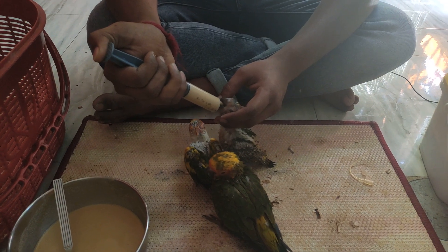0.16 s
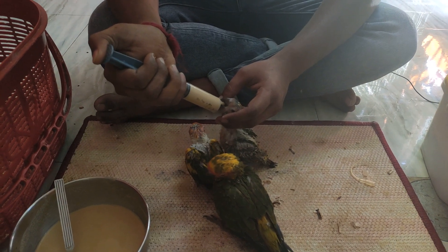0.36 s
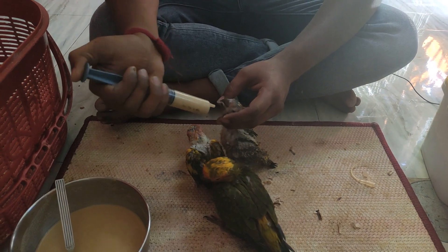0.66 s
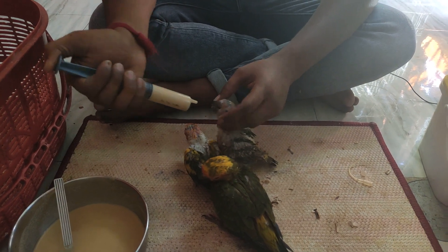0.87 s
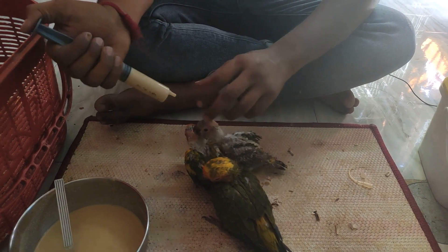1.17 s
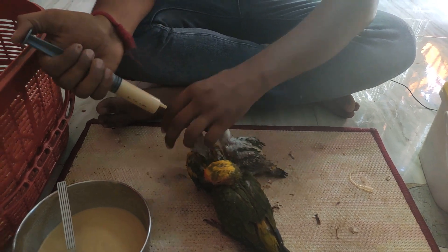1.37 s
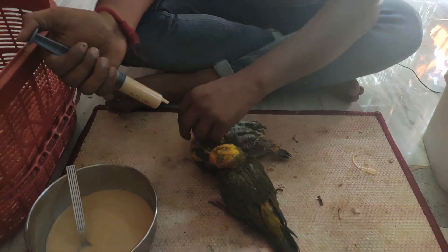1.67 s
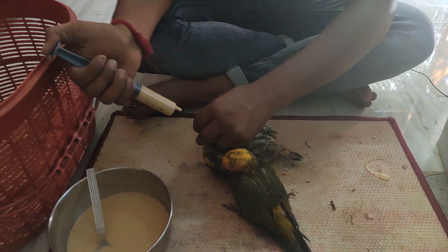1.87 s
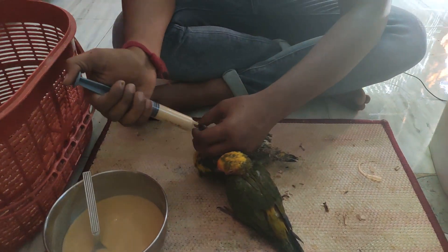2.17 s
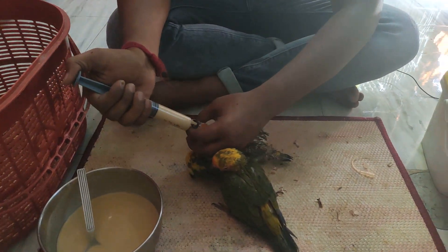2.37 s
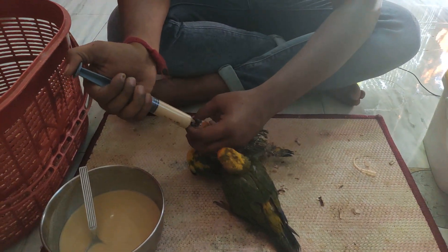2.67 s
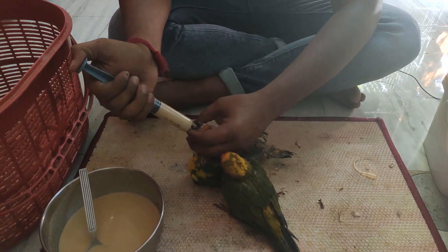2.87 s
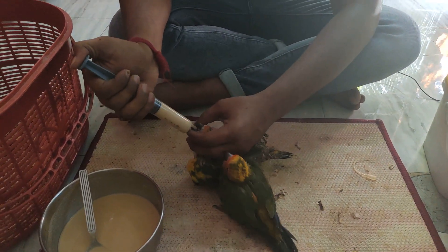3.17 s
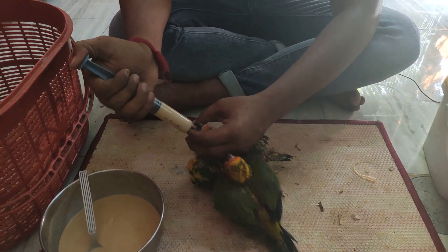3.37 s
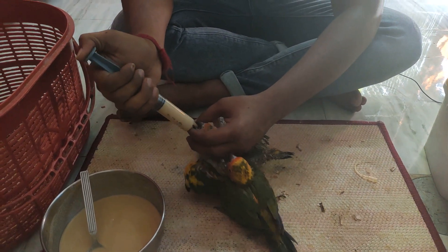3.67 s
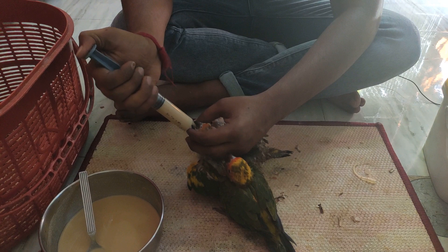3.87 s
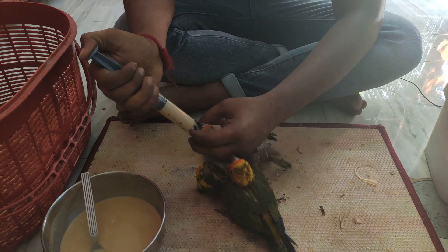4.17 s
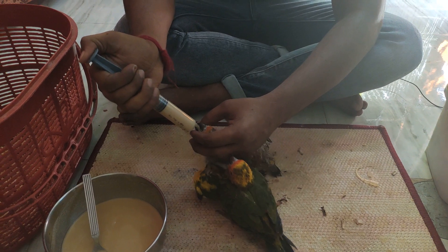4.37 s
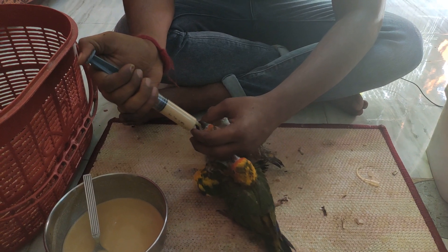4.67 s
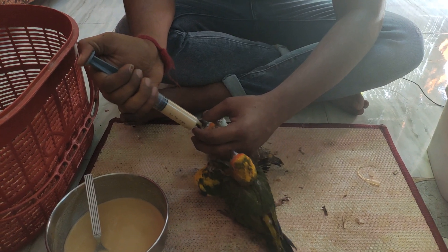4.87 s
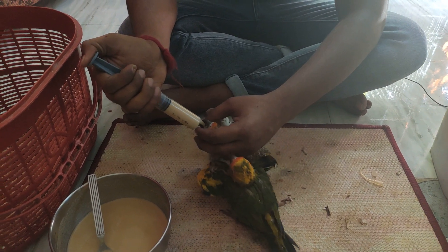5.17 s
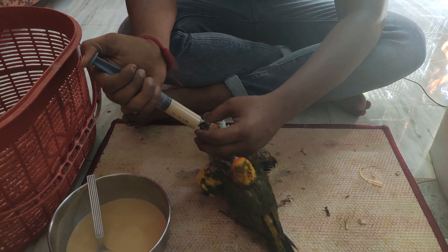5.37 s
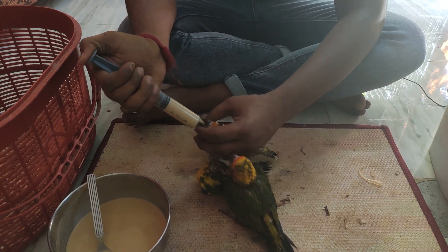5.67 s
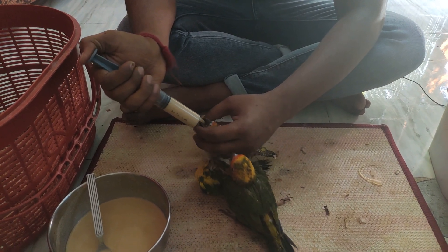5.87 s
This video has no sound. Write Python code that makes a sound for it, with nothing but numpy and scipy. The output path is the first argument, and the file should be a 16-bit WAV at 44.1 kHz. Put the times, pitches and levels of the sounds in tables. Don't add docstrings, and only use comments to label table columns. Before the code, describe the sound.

A parrot chick begs in rapid stuttering high squeaks for about a second and a half in a tiled room, then sharp beak knocks and soft rustling follow.

```python
import sys
import numpy as np
from scipy import signal
from scipy.fft import rfft, irfft, next_fast_len
from scipy.io import wavfile
from scipy.ndimage import uniform_filter1d, map_coordinates

SR = 44100
rng = np.random.default_rng(int(sys.argv[2]) if len(sys.argv) > 2 else 0)


def linear_from_db(decibels):
    return 10 ** (np.asarray(decibels, float) / 20)


def store_pcm(level_fs):
    pcm = np.round(np.clip(level_fs, -1, 1) * 32767).astype(np.int16)
    wavfile.write(sys.argv[1], SR, np.atleast_2d(pcm).T)


N = 265217

# frequency in Hz, level in dB.
HUM_COLOUR = [(16, -27.5), (28, 6.5), (69, -26), (90, -12), (224, -11), (649, -20), (703, -20.5),
              (994, -26), (1330, -24.5), (1790, -35), (2100, -30), (7940, -39.5), (16300, -43)]
HUM_DB = -56.5

# time in seconds, rustle level in dB.
STIR = [(0.0, -50), (.1, -67), (.9, -66.5), (1.138, -58), (1.5, -66), (1.86, -55), (3.5, -58.5),
        (3.89, -64), (4.1, -48.5), (4.31, -49), (4.38, -55), (4.51, -43), (4.72, -62), (4.88, -52.5),
        (5.11, -61.5), (5.3, -53), (5.78, -63.5), (6.01, -48.5)]
# frequency in Hz, level in dB.
RUSTLE_COLOUR = [(150, -12.5), (400, -3), (900, -3.5), (1600, -8), (3000, -16.5), (6000, -30.5),
                 (14000, -39)]
# peak in seconds, level in dB, seconds to swell and to fade by 20 dB.
THUDS = [(.73, -55, 0.2), (1.138, -58, 0.5), (1.392, -61, 0.3), (1.73, -60, 0.8), (3.5, -59.5, 0.4),
         (3.78, -60.5, 0.15), (4.22, -48, 0.57), (4.44, -50, .08), (5.3, -42, .27), (5.68, -47, 0.1),
         (6.01, -47.5, 0.54)]
STILL_DB = -72

# start in seconds, length in ms,
# level in dB, centre in Hz, width in Hz.
WHEEZES = [(1.675, 63, -49.5, 6120, 1510), (1.674, 59, -50, 10000, 2480), (1.863, 25, -52, 7000, 3200),
           (2.001, 40, -66, 7800, 3200), (2.082, 15, -52, 7500, 2900), (5.57, 35, -63, 6450, 600),
           (0.951, 180, -63.5, 1100, 500), (1.672, 40, -50, 1800, 1400), (1.675, 50, -55, 3600, 2000),
           (3.309, 10, -19, 4800, 2200), (3.309, 8, -22, 3500, 900), (4.948, 14, -46, 8800, 2600),
           (4.967, 10, -46, 8500, 4000), (5.565, 35, -58, 1450, 250), (5.57, 35, -64, 3100, 400),
           (5.24, 12, -63, 10200, 2000), (5.262, 14, -65, 11000, 1200), (5.17, 28, -50, 1800, 2500),
           (5.985, 25, -64, 7100, 700), (5.44, 30, -70, 3300, 700), (5.476, 16, -64, 3800, 1500),
           (5.705, 14, -63, 4200, 700), (5.415, 12, -61, 1600, 1200), (5.91, 40, -58, 1500, 1500),
           (5.912, 12, -64, 4300, 1500), (.276, 25, -64, 8500, 4000), (.395, 18, -64, 8500, 1600),
           (1.035, 14, -66, 11000, 4500), (1.294, 6, -60, 4200, 3000), (1.15, 45, -64, 3200, 1500),
           (0.0, 30, -64, 4300, 1200), (4.97, 62, -47.5, 3480, 3500), (5.2, 150, -54, 320, 300),
           (5.861, 160, -51, 500, 700), (4.521, 14, -56, 9500, 2500), (4.531, 48, -48.5, 9830, 800),
           (4.52, 53, -54, 3000, 2500), (1.33, 110, -76, 11700, 600), (1.779, 56, -70, 11780, 800),
           (5.735, 20, -68, 11000, 3000)]
# start in seconds, length in ms, level in dB, centre in Hz, width in Hz.
BRUSHES = [
    (1.15, 92, -63, 3500, 6100),
    (4.075, 120, -62.5, 11000, 5000),
    (4.25, 110, -68, 10000, 7000),
    (4.45, 150, -68, 11000, 6000),
    (4.6, 290, -69, 10300, 8100),
    (4.95, 330, -67.5, 10000, 8800),
    (5.4, 350, -71, 10000, 7700),
    (4.3, 60, -67, 10000, 7000),
    (.72, 38, -64.5, 8800, 5000),
]

# start in seconds, peak in dB, ring in Hz.
TICKS = [(.276, -48, 396), (.396, -42.5, 397), (.73, -53, 463), (1.136, -47, 620), (1.176, -44, 410),
         (1.468, -40, 620), (3.993, -39, 813), (4.385, -41.5, 940), (4.445, -48, 770), (4.699, -43, 447),
         (4.912, -36, 834), (5.244, -37, 770), (5.58, -45.5, 1494), (5.666, -38, 852), (5.709, -42, 1300)]
TICK_CRACK_DB, TICK_T60_S = -12, 0.018
# start in seconds, peak in dB, ring in Hz, crack in dB, t60 in seconds.
KNOCKS = [(1.668, -31.5, 1000, -33, 0.025), (1.674, -34, 614, -16, 0.038), (1.673, -26, 433, -12, 0.0087),
          (3.423, -32.5, 2030, -16, 0.025), (4.088, -31, 760, -18, 0.039), (4.106, -24.5, 800, -38, 0.01),
          (4.115, -26.5, 620, -31, 0.021), (4.119, -29.5, 825, -17, 0.03), (4.324, -14.5, 775, -46, 0.0063),
          (4.326, -27, 800, -17, 0.036), (4.488, -23.5, 800, -22, 0.014), (4.523, -36, 835, -34, 0.034),
          (4.553, -33.5, 740, -47, 0.027), (4.751, -32.5, 789, -20, 0.018), (4.838, -33, 1530, -11, 0.01),
          (4.968, -9.5, 850, -16.5, 0.016), (5.147, -22.5, 422, -29.5, 0.0095),
          (5.18, -36, 700, -30, 0.044), (5.193, -24, 963, -21, 0.025)]
# start in seconds, peak in dB, ring in Hz.
TAPS = [(2.056, -39, 965), (2.077, -46, 685), (2.126, -45, 875), (2.143, -38.5, 971), (2.163, -28, 945),
        (2.328, -40.5, 855), (2.404, -27, 1200), (2.407, -27, 1350), (2.43, -24.5, 880),
        (2.523, -35.5, 840), (2.615, -44.5, 807), (2.651, -36, 873), (2.701, -26, 780),
        (2.757, -42.5, 1026), (2.779, -31, 814), (2.952, -30, 923), (3.034, -36.5, 864), (3.101, -39, 967),
        (3.168, -37, 808), (3.193, -35, 835), (3.231, -36.5, 770), (3.381, -30, 720), (3.392, -35, 700),
        (2.438, -33, 800), (2.962, -34, 800), (3.238, -31.5, 1500), (3.795, -47.5, 888), (3.925, -49, 1349),
        (4.15, -38.5, 780), (4.175, -40, 1020), (4.457, -40.5, 830), (4.898, -36, 840), (5.376, -41, 766),
        (5.685, -42.5, 831), (5.938, -40, 1250), (5.895, -43, 800)]
TAP_CRACK_DB, TAP_T60_S = -24, 0.026

# start in seconds, length in ms, fundamental in dB,
# start pitch in Hz, end pitch in Hz.
OPENING_PUFFS = [(1.881, 7.3, -27, 1860, 1930), (1.8933, 6.5, -24.3, 1960, 2070),
                 (1.967, 5.5, -31, 1780, 1660), (2.0084, 6, -21.3, 1830, 1970),
                 (2.0944, 6, -20, 1800, 1990), (2.1719, 5.8, -19.5, 1850, 1815),
                 (2.1811, 14.1, -17.4, 1818, 1829), (2.2592, 8.8, -15.5, 1890, 1856),
                 (2.3349, 9.4, -18.6, 1812, 1859), (2.4091, 6.4, -16.7, 1855, 1805),
                 (2.4871, 5.8, -17.3, 1934, 1685), (2.5539, 9, -17.2, 1868, 1800),
                 (2.6311, 5.7, -14.2, 1975, 1830), (2.6974, 8.9, -19, 1769, 1846),
                 (2.7115, 6.5, -16.8, 1950, 1640), (2.7747, 6.5, -14.7, 1932, 1737),
                 (2.8399, 11.1, -15.2, 1966, 1799), (2.9071, 10.5, -14.8, 1987, 1783),
                 (2.9729, 5.4, -16, 2018, 1791), (3.0406, 8, -17.5, 1830, 1950),
                 (3.1119, 4.1, -19, 2000, 1800), (3.1747, 7.9, -15.5, 1863, 1958),
                 (3.2937, 7.3, -21.4, 1686, 1794), (3.3062, 7.6, -20.5, 1640, 1800)]
# start in seconds, length in ms,
# fundamental in dB, middle pitch in Hz.
TRAILING_PUFFS = [(2.018, 12, -31, 1960), (2.105, 14, -30, 1940), (2.7066, 3, -27, 1760),
                  (2.268, 9, -20.5, 1770), (2.277, 5, -34, 1660), (2.196, 4, -32, 1720),
                  (2.3545, 4, -31, 1650), (2.432, 4, -30, 1680), (2.5762, 3, -27, 1690),
                  (3.3022, 4, -33, 1620), (2.345, 10, -23.5, 1770), (2.4152, 11.8, -18, 1815),
                  (2.427, 5, -26.5, 1735), (2.4929, 6, -21, 1815), (2.5629, 7.2, -17.8, 1835),
                  (2.5701, 6.5, -24, 1765), (2.6368, 6.6, -16.3, 1880), (2.6436, 7.4, -27, 1735),
                  (2.7812, 5.8, -26.5, 1755), (2.9783, 4.5, -14.5, 1965), (2.984, 8.4, -21, 1780),
                  (3.0486, 11, -20, 1754), (3.1185, 6.7, -27.7, 1646), (3.1826, 11.1, -20.4, 1743),
                  (3.3139, 5.6, -23.6, 1676)]
OVERLAP_MS = 0.45
SAG_HZ_PER_MS2 = 1.5
QUAVER_S, QUAVER_MS, QUAVER_DB, QUAVER_DIP_DB = 1.9014, 6.95, -33, -2
QUAVER_HZ, QUAVER_ARCH_HZ, QUAVER_SWING_HZ = 2057, 40, 50
RISE_PER_MS, FALL_PER_MS = 145, 125

# time in seconds, extra overtone lift in dB, rasp in dB,
# sharpness of closure in dB.
EFFORT = [(1.885, -8, -21, -7), (1.897, -5, -26, 4), (1.905, -9, -26, -10), (1.96, -9, -26, -9),
          (1.97, -7, -21, -1), (2.01, -4.5, -28, 3), (2.024, -10, -29, -12), (2.097, -4.5, -28, 1),
          (2.112, -11, -29, -13), (2.175, 1.5, -23, 3), (2.35, 0, -21, 2), (2.49, 0.5, -21, -1.5),
          (2.6, 0.5, -18.5, -0.5), (2.78, -0.5, -21, -2), (2.87, 0.5, -23, .5), (3.05, 0, -21, -1),
          (3.113, -5.5, -20, -16), (3.122, -3, -20, -8), (3.185, -2, -19, 0), (3.297, -3.5, -18, -5),
          (3.31, -4.5, -10, -1)]
LIFT_DB, LIFT_DB_PER_HZ, LIFT_MID_HZ = 8.5, -0.0409, 1814.4
# frequency in Hz, level in dB.
THROAT = [(2600, -4), (3000, 1.5), (3300, -1.5), (4200, 1.5), (4900, 0.5), (5350, -8), (5800, -14),
          (6600, -3.5), (7600, -10), (8800, -14.5), (11000, -24), (12700, -27), (14000, -39), (15000, -41),
          (15600, -36), (16000, -65)]
PATCHY_DB = 0.45
WARM_UP_S, WARM_UP_DULL_DB = 2.15, 9

# start in seconds, length in ms, fundamental in dB,
# start pitch in Hz, end pitch in Hz.
PEEPS = [
    (4.02, 56, -56.5, 2306, 2380),
    (4.09, 100, -61, 2390, 2320),
    (4.165, 42, -60, 2400, 2391),
    (4.225, 70, -55, 2360, 2433),
    (4.3, 82, -59.5, 2413, 2338),
    (4.765, 30, -60, 2350, 2400),
    (4.79, 19, -56, 2382, 2320),
    (4.812, 10, -46, 2273, 2150),
]
PEEP_LIFT_PER_DB = 0.8

# start in seconds, peak in dB, brightness in dB.
RIM_HITS = [
    (4.4775, -49, 0),
    (4.523, -42, 0),
    (4.533, -42.5, 2),
    (4.545, -45, 3),
    (4.9482, -28, 2),
    (4.9545, -34, 1),
    (4.9685, -30.5, -2),
]
# frequency in Hz, level in dB, t60 in seconds.
RIM_MODES = [(2076, -0.5, 0.061), (2106, -11, .2), (3070, -20, .05), (3770, -5.5, .035), (4090, -6, 0.035),
             (4500, -19, .06), (6100, -13.5, .035), (8400, -22, 0.015)]

# delay in seconds, level in dB.
ECHOES = [(.0045, -23), (.012, -23), (.021, -22.5), (.031, -24.5)]
# band in Hz, t60 in seconds, level in dB.
ROOM = [(300, .4, -4.5), (900, 0.32, -15), (1350, .38, -14), (1850, 0.44, -10.5), (2700, .4, -16),
        (3600, 0.36, -20), (5300, 0.36, -6), (7200, 0.34, -18), (10000, 0.27, -10.5), (14000, 0.18, -15)]

# start in seconds, length in ms, lower edge in Hz.
PATCHES = [(.085, 48, 2500), (.165, 22, 2500), (.21, 22, 3000), (.465, 22, 3000), (.612, 24, 2500),
           (.768, 22, 3500), (1.152, 36, 8500), (1.348, 22, 3000), (3.395, 26, 9000), (4.025, 24, 3500),
           (4.53, 20, 11000), (4.62, 26, 5000), (5.57, 24, 2000), (5.852, 22, 2500), (5.93, 22, 4500),
           (5.99, 22, 3500)]
STAND_OUT, LOST_SHARE = 1.6, 0.88
BLOCK_S, THIN_HZ, THIN_STAND_OUT = 0.0232, 13500, 1.05


def colour(x, points):
    hz, db = np.transpose(points)
    size = next_fast_len(len(x))
    f = np.maximum(np.fft.rfftfreq(size, 1 / SR), 1)
    gain = linear_from_db(np.interp(np.log(f), np.log(hz), db))
    return irfft(rfft(x, size) * gain, size)[:len(x)]


def unit(x):
    return x / np.sqrt(np.mean(x ** 2))


def band(x, hz, width_hz):
    size = next_fast_len(len(x))
    f = np.fft.rfftfreq(size, 1 / SR)
    bell = np.exp(-2 * ((f - hz) / width_hz) ** 2)
    return irfft(rfft(x, size) * bell, size)[:len(x)]


def add(out, s, x):
    i = int(s * SR)
    out[i:i + len(x)] += x[:N - i]


def walk(rate):
    k = int(SR / rate)
    return unit(uniform_filter1d(uniform_filter1d(rng.standard_normal(N), k), k))


def decay(t, t60):
    return np.exp(-np.log(1000) * t / t60)


def hum():
    noise = unit(colour(rng.standard_normal(N), HUM_COLOUR)) * linear_from_db(HUM_DB)
    low = band(noise, 0, 1500)
    return low * linear_from_db(0.5 * walk(6)) + (noise - low) * linear_from_db(0.8 * walk(5.8))


def rustle():
    t = np.arange(N) / SR
    rustle_db = np.interp(t, *np.transpose(STIR))
    thud_db = np.max([db - 20 * abs(t - s) / fade_s for s, db, fade_s in THUDS], axis=0).clip(STILL_DB)
    grains = rng.standard_normal(N) * linear_from_db(2.1 * walk(120) + 2.44 * walk(25))
    thud_colour = [(20, -23), (38, 6.5), (70, -7.5), (150, -7), (300, -50.5)]
    thud = unit(colour(rng.standard_normal(N), thud_colour))
    return linear_from_db(rustle_db - 3.5) * unit(colour(grains, RUSTLE_COLOUR)), linear_from_db(thud_db - 3.5) * thud


def wheezes(events):
    out = np.zeros(N)
    for s, ms, db, hz, width_hz in events:
        u = np.linspace(0, 1, int(ms * SR / 1000))
        noise = unit(band(rng.standard_normal(16384), hz, width_hz))[:len(u)]
        add(out, s, linear_from_db(db) * np.sin(np.pi * u ** 0.46) * noise)
    return out


def clicks(events):
    out, t = np.zeros(N), np.arange(3000) / SR
    grit_colour = [(300, -10), (1500, 0), (3500, -2), (6000, -13), (12000, -15), (16000, -25)]
    grit = 0.6 * unit(colour(rng.standard_normal(N), grit_colour))
    scrape = unit(band(rng.standard_normal(N), 1100, 1800))
    for s, db, hz, crack_db, t60 in events:
        here = slice(int(s * SR), int(s * SR) + len(t))
        fade = decay(t, max(t60, 0.003)) * (1 - np.exp(-t / 0.0011))
        knock = np.sin(2 * np.pi * hz * t) + linear_from_db(-16.5) * np.sin(2 * np.pi * 1.6 * hz * t)
        knock += linear_from_db(-6.5) * scrape[here]
        crack = linear_from_db(crack_db + 1) * grit[here] * np.exp(-t / 0.0019)
        add(out, s, linear_from_db(db + 2.5) * (fade * knock + crack))
    return colour(out, [(120, -30), (350, -1), (700, 0), (16000, 0)])


def puffs():
    trailing = []
    for s, ms, db, hz in TRAILING_PUFFS:
        sag = SAG_HZ_PER_MS2 * ms ** 2 / 2
        trailing.append((s - OVERLAP_MS / 1000, ms + OVERLAP_MS, db, hz + sag, hz - sag))
    quaver = []
    for k, arch in enumerate(np.sqrt(abs(np.sin(np.linspace(0, np.pi, num=9))))):
        middle = QUAVER_HZ + QUAVER_ARCH_HZ * arch
        swing = (-1) ** k * QUAVER_SWING_HZ
        start = QUAVER_S + k * QUAVER_MS / 1000
        quaver.append((start, QUAVER_MS, QUAVER_DB + QUAVER_DIP_DB * arch, middle + swing, middle - swing))
    rows, effort = np.array(list(OPENING_PUFFS) + trailing + quaver), np.array(EFFORT)
    lift_db = LIFT_DB + LIFT_DB_PER_HZ * (rows[:, 3:].mean(axis=1) - LIFT_MID_HZ)
    lift_db = lift_db + np.interp(rows[:, 0], effort[:, 0], effort[:, 1])
    return np.column_stack([rows, lift_db])


def squeak(puffs, wobble, flutter_db, breath_db, sharp_db, hollow, dull_db=0):
    pressure, hz, lift_db, swing = np.full(N, 1e-9), np.full(N, 2e-6), np.zeros(N), np.zeros(N)
    for s, ms, db, start_hz, end_hz, puff_lift_db in puffs:
        t = np.arange(-8, ms + 10, 1000 / SR)
        edge = np.clip(np.minimum(t + 0.5, ms + 0.5 - t) / 3.4, 0, 1)
        shape = np.sin(np.pi / 2 * edge) ** 1.5
        skirt = np.exp(np.minimum(t, 0) / 3.4 + np.minimum(ms - t, 0) / 2.6)
        shape += linear_from_db(-12) * skirt * (1 - shape)
        glide = start_hz + (end_hz - start_hz) * np.clip(t / ms, 0, 1)
        glide += RISE_PER_MS * np.minimum(t, 0) + FALL_PER_MS * np.minimum(ms - 1.1 - t, 0)
        for curve, value in ((pressure, 1), (hz, glide), (lift_db, puff_lift_db), (swing, shape)):
            add(curve, s - 0.008, linear_from_db(db + 1.5) * shape * value)
    hz = hz / pressure * (1 + wobble * walk(300))
    lift_db, swing = lift_db / pressure, swing / pressure
    turns = np.cumsum(hz) / SR
    hiss = unit(band(rng.standard_normal(N), 0, 1200))
    throat_hz, throat_db = np.transpose(THROAT)
    wave = np.sin(2 * np.pi * turns)
    for k in range(2, 10):
        colour_db = lift_db
        if k > 2:
            colour_db = (0.3 + 0.22 * (k - 3)) * lift_db + sharp_db
            colour_db = colour_db + 0.25 * (k - 4) * np.minimum(sharp_db, 0) - dull_db * max(k - 5, 0)
        tube_db = np.interp(np.log(k * hz), np.log(throat_hz), throat_db)
        patchy_db = PATCHY_DB * (k - 1) * walk(350)
        gain = linear_from_db(colour_db + patchy_db + tube_db) * swing ** (0.2 * k)
        ragged = 1 + linear_from_db(breath_db + 1.2 * k) * hiss + linear_from_db(breath_db - 2) * np.sin(np.pi * turns)
        ragged = ragged / np.sqrt(1 + linear_from_db(2 * breath_db + 2.4 * k))
        wave += gain * ragged * np.sin(2 * np.pi * k * turns + 0.7 * k * k) * (k * hz < 15900)
    breath_colour = [(400, -22), (800, -4.5), (1350, 8), (2500, -2), (5000, -4), (9000, 5), (15000, -25)]
    breath = unit(colour(rng.standard_normal(N), breath_colour))
    voice = pressure * linear_from_db(flutter_db * walk(300)) * (wave + linear_from_db(breath_db + 2) * breath)
    return voice - hollow * band(voice, 2650, 620) - hollow * 1.5 * band(voice, 4480, 330)


def rim():
    out, t = np.zeros(N), np.arange(9000) / SR
    chances = rng.standard_normal((len(RIM_HITS), len(RIM_MODES)))
    for (s, db, bright_db), chance in zip(RIM_HITS, chances):
        for (hz, mode_db, t60), c in zip(RIM_MODES, chance):
            gain = linear_from_db(db + mode_db + 1.5 * c + bright_db * (hz > 2500))
            ring = np.sin(2 * np.pi * hz * t) * decay(t, t60)
            add(out, s, gain * ring * (1 - np.exp(-t / 0.0004)))
    return out


def room(x):
    t = np.arange(int(0.7 * SR)) / SR
    tail, echoes = np.zeros(len(t)), np.zeros(len(t))
    for hz, t60, db in ROOM:
        part = band(rng.standard_normal(len(t)), hz, 0.7 * hz)
        part = part * decay(t, t60) * np.clip((t - 0.005) / 0.012, 0, 1)
        tail += linear_from_db(db) * part / np.sqrt(np.sum(part ** 2) * SR / hz)
    for s, db in ECHOES:
        echoes[int(s * SR)] = linear_from_db(db)
    bobbing = map_coordinates(x, [np.arange(N) + 3.4 * walk(300)], order=3)
    return x + signal.fftconvolve(x, echoes)[:N] + signal.fftconvolve(bobbing, tail)[:N]


def scene():
    t = np.arange(N) / SR
    feathers, thud = rustle()
    s, _, *columns = np.transpose(EFFORT)
    rasp_db, sharp_db = (np.interp(t, s, column) for column in columns)
    call = squeak(puffs(), wobble=0.009, flutter_db=0.6, breath_db=rasp_db, sharp_db=sharp_db, hollow=0.3,
                  dull_db=WARM_UP_DULL_DB * (t < WARM_UP_S))
    peeps = [(*row, PEEP_LIFT_PER_DB * row[2]) for row in PEEPS]
    mate = squeak(peeps, wobble=0.012, flutter_db=4, breath_db=-24, sharp_db=-8, hollow=0)
    ticks = [(*row, TICK_CRACK_DB, TICK_T60_S) for row in TICKS]
    taps = [(*row, TAP_CRACK_DB, TAP_T60_S) for row in TAPS]
    contacts = clicks(list(KNOCKS) + ticks + taps)
    echoing = room(call + mate + rim() + contacts + wheezes(WHEEZES))
    return (echoing + feathers + thud + hum() + wheezes(BRUSHES))[None]


def thin_treble(x):
    out, f = x.copy(), np.fft.rfftfreq(4096, 1 / SR)
    always = [(s, 2000 * BLOCK_S, THIN_HZ) for s in np.arange(0, N / SR - BLOCK_S, 1.6 * BLOCK_S)]
    for s, ms, hz in list(PATCHES) + always:
        start = int(s * SR)
        part = out[start:start + int(ms * SR / 1000)]
        window = np.sin(np.linspace(0, np.pi, len(part)))
        size = abs(rfft(part * window, 4096))
        ratio = STAND_OUT if hz < THIN_HZ else THIN_STAND_OUT
        lost = (f > hz) & (uniform_filter1d(size, 5) < ratio * uniform_filter1d(size, 160))
        removed = irfft(rfft(part, 4096) * lost, 4096)[:len(part)]
        add(out, s, -LOST_SHARE * window ** 0.5 * removed)
    return out


def roll_off(x):
    return signal.sosfilt(signal.butter(12, 16460, fs=SR, output="sos"), x)


def record(dry):
    rounded = np.tanh(dry[0] / 1.4) * 1.4
    heard = colour(rounded, [(15, -30), (28, -9), (38, 0), (15000, 0), (15750, 0), (15950, -14),
                             (16400, -17), (16480, -70)])
    mix = thin_treble(heard)[None]
    return roll_off(mix)


dry = scene()
out = record(dry)
store_pcm(out)
```